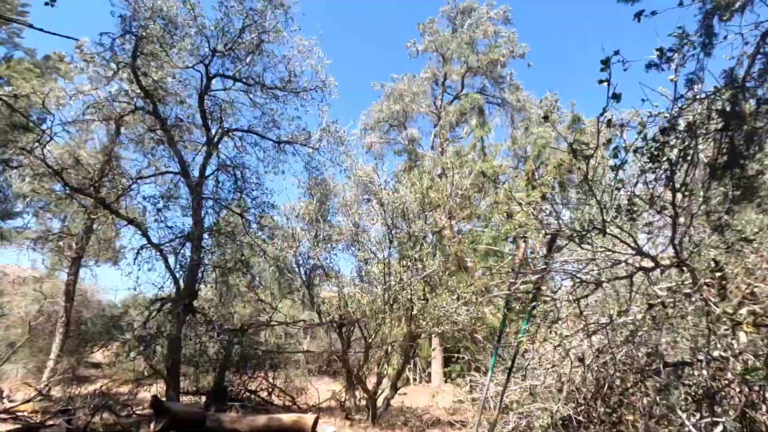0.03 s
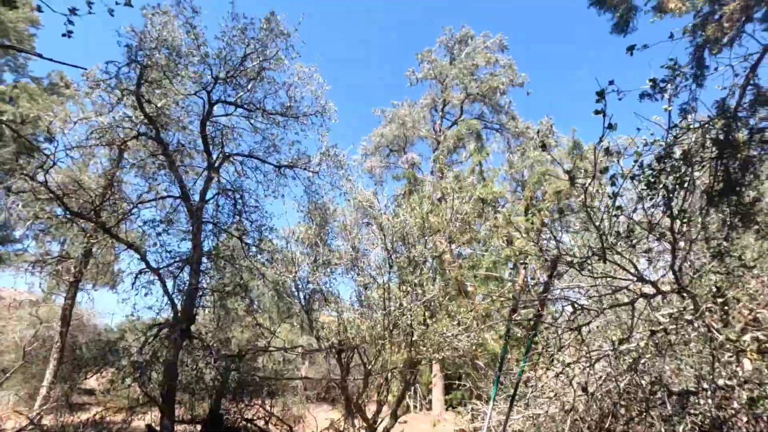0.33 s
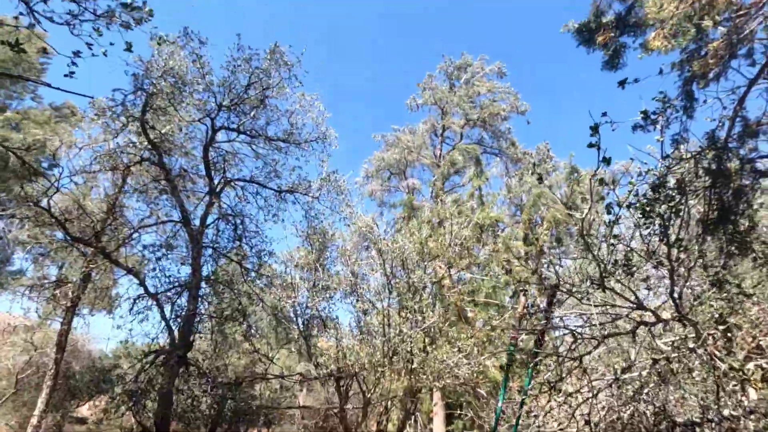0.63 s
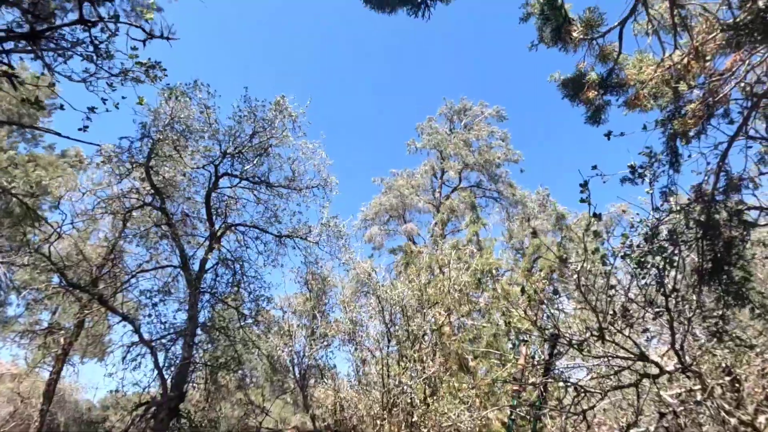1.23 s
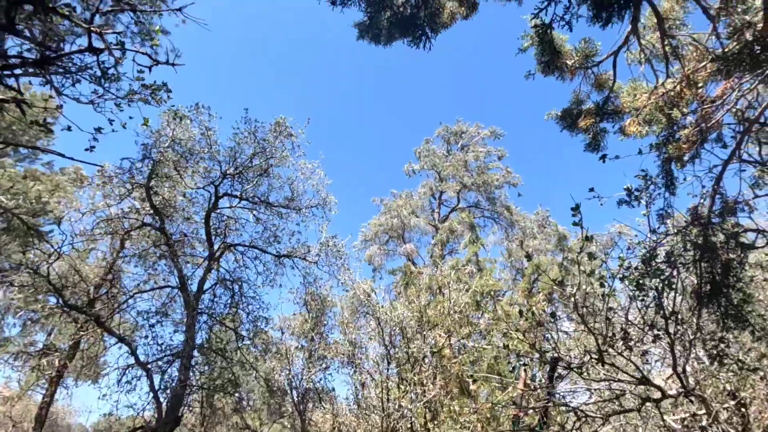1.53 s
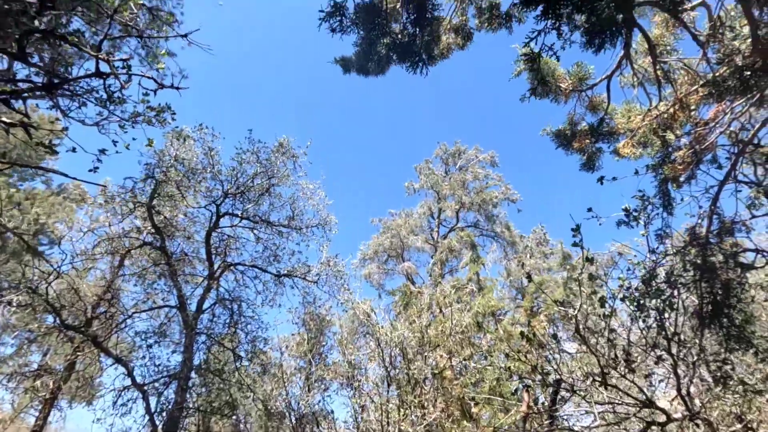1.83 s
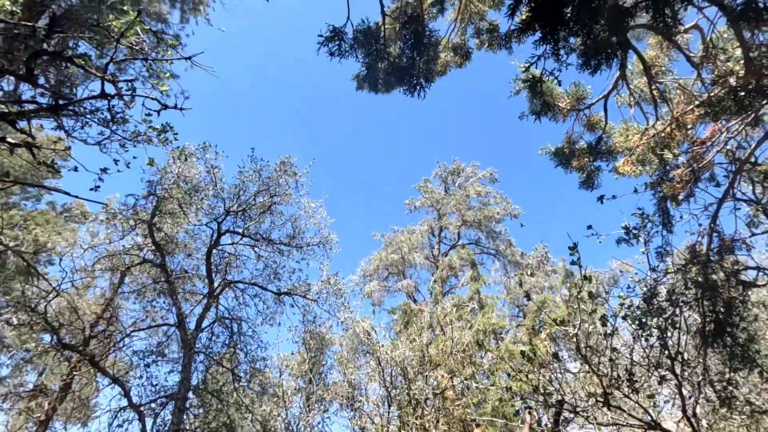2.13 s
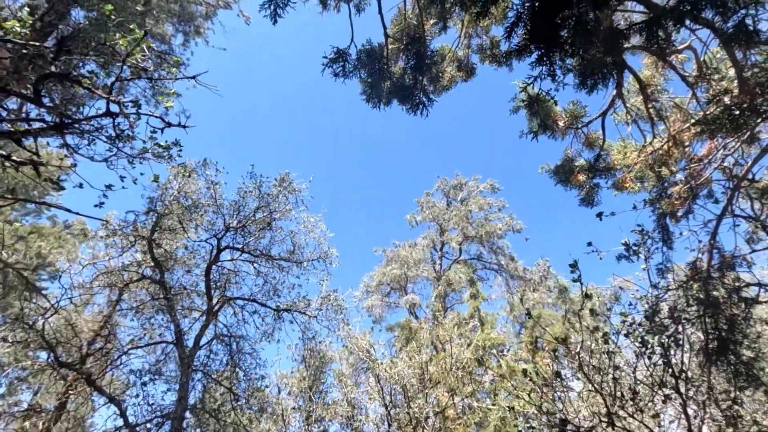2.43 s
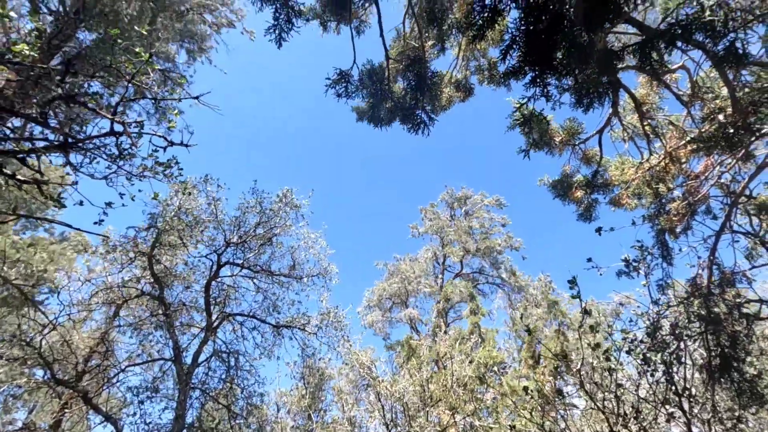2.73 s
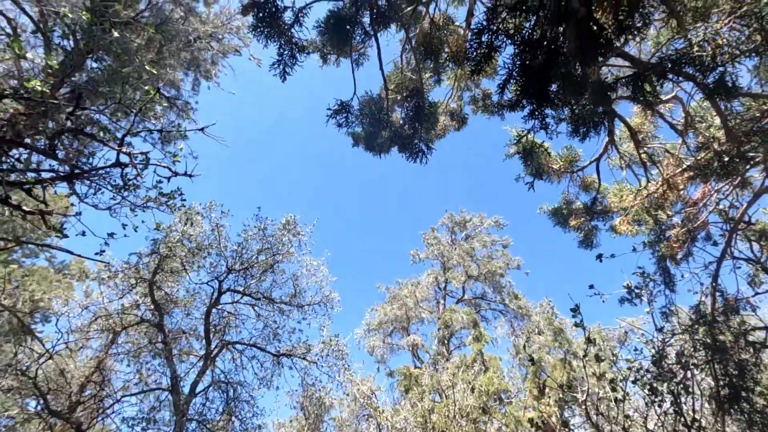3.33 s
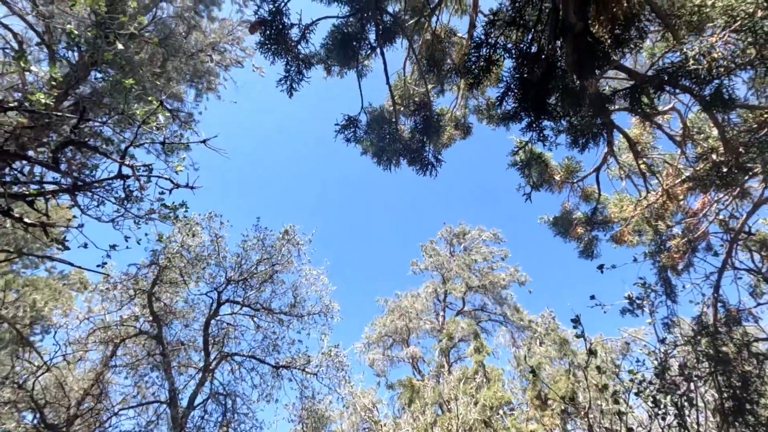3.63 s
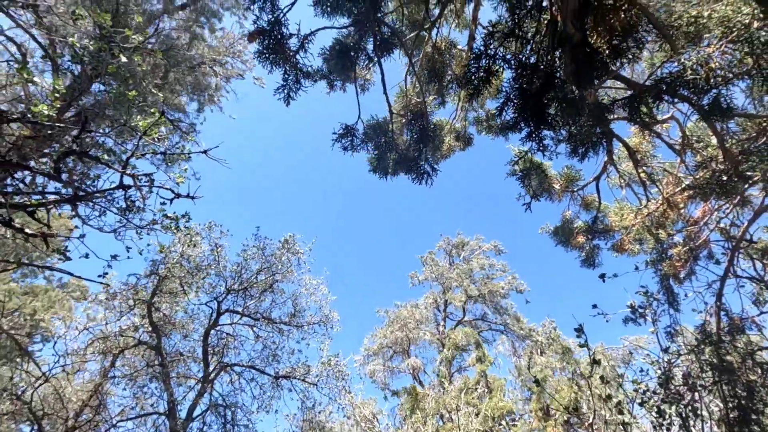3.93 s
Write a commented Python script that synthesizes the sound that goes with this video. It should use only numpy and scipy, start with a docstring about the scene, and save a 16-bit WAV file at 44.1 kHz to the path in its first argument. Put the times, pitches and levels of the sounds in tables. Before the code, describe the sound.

Uneven low wind buffeting on the microphone, with pines rushing gently behind it.

```python
"""A lumpy rumble and a few thumps of wind on the microphone, over the rush of pines easing after a gust.
One microphone stands near the ground in a clearing, where eddies press on it. In the crowns all around,
needles and twigs shed vortices, and hollow roars swell briefly as gusts cross the boughs.
The nearest needles hiss above the rush; faintly, dry leaves brush together and twigs tick."""
import sys
import numpy as np
from scipy import signal
from scipy.fft import rfft, irfft
from scipy.io import wavfile
from scipy.ndimage import uniform_filter1d

SR = 44100
rng = np.random.default_rng(int(sys.argv[2]) if len(sys.argv) > 2 else 0)


def dump_mix(stems):
    """Bounce the given channels to the path in sys.argv[1] as a 16-bit WAV at rate SR."""
    frames = np.atleast_2d(stems).T  # one column per channel
    limited = np.clip(frames, -1, 1)  # hard clip at full scale
    pcm = np.round(limited * 32767).astype(np.int16)
    wavfile.write(sys.argv[1], SR, pcm)


N = 176400
T = np.arange(N) / SR


def amp(db):
    """Decibels to gain."""
    return 10 ** (np.asarray(db) / 20)


def unit(x):
    """Scales to rms 1."""
    return x / np.sqrt(np.mean(x ** 2) + 1e-20)


def steadied(x, size):
    """Holds the rms near 1 over about size samples."""
    return x / np.sqrt(uniform_filter1d(uniform_filter1d(x ** 2, size), size) + 1e-12)


def curve(points, t):
    """Reads a control curve at times t."""
    return np.interp(t, *np.transpose(points))


def spectrum(points, hz):
    """Gain of a decibel spectrum, read on a log-frequency axis."""
    points_hz, db = np.transpose(points)
    return amp(np.interp(np.log(hz + 1), np.log(points_hz + 1), db))


def hump(hz, centre_hz, octaves):
    """Gain of a bell-shaped band."""
    return np.exp(-.5 * (np.log2((hz + 1) / centre_hz) / octaves) ** 2)


def band(x, centre_hz, octaves):
    """Filters x through a bell-shaped band."""
    hz = np.fft.rfftfreq(len(x), 1 / SR)
    return irfft(rfft(x) * hump(hz, centre_hz, octaves), len(x))


def noise(colour, patchy_db, patch_s, patch_hz, size):
    """Noise of rms 1 shaped by the gain colour(t, hz), with random louder and softer patches."""
    hop = size // 4
    t = np.arange(N // hop + 5)[:, None] * hop / SR
    hz = np.fft.rfftfreq(size, 1 / SR)
    real, imag, patches = rng.standard_normal((3, len(t), len(hz)))
    patches = uniform_filter1d(patches, max(1, round(patch_s * SR / hop)), 0)
    patches = unit(uniform_filter1d(patches, max(1, round(patch_hz * size / SR)), 1))
    gain = colour(t, hz)
    gain = gain / np.linalg.norm(gain, axis=-1, keepdims=True)
    frames = (real + 1j * imag) * gain * amp(patchy_db * patches)
    return unit(signal.istft(frames.T, nperseg=size, noverlap=size - hop)[1][:N])


# Twigs touching, barely audible at the microphone: start_s, peak_db
TWIG_TICKS = [(0.1136, -65), (1.2999, -72), (1.3783, -65), (1.705, -70), (1.9764, -66), (3.5818, -72)]


def twig_ticks(decay_s=.0014):
    """Dry twigs touch, each with one tiny, bright snap."""
    out = np.zeros(N)
    t = np.arange(512) / SR
    for start_s, peak_db in TWIG_TICKS:
        burst = rng.standard_normal(len(t)) * np.exp(-t / decay_s)
        snap = band(np.roll(burst, len(t) // 10), centre_hz=12200, octaves=.09)
        at = round(start_s * SR)
        out[at:at + len(snap)] += snap / abs(snap).max() * amp(peak_db)
    return out


# Sizzle of dry leaves around the clearing: time_s, relative_db
LEAF_SIZZLE = [(0, -88), (0.25, -87), (0.55, -78), (0.75, -81.5), (0.95, -86.5), (1.8, -84), (2.5, -87.5),
               (3.0, -82), (3.55, -88.5), (3.7, -99), (4, -95)]
# Thin swish of the leaves brushing: time_s, level_db
LEAF_SWISH = [(0, -78), (0.3, -71), (0.5, -67), (0.75, -69), (0.9, -81), (2.65, -82), (2.82, -72.5),
              (3.3, -74.5), (3.65, -84), (4, -86)]


def leaf_rustle(touches_per_s=5100, spread_db=3, flutter_db=1.5, flutter_s=.03, sizzle_gain_db=-2.5):
    """Dry leaves brush each other: a thin swish, a sizzle of tiny grains and an airy hiss at its height."""
    touches = rng.random(N) < touches_per_s / SR
    strength = amp(spread_db * np.minimum(rng.exponential(1, N), 4))
    grains = band(touches * strength, centre_hz=12400, octaves=.06)
    flutter = unit(uniform_filter1d(rng.standard_normal(N), round(flutter_s * SR)))
    sizzle_db = curve(LEAF_SIZZLE, T) + sizzle_gain_db
    sizzle = unit(grains * amp(flutter_db * flutter)) * amp(sizzle_db)
    swish = unit(band(rng.standard_normal(N), centre_hz=5560, octaves=.11))
    air = unit(band(rng.standard_normal(N), centre_hz=11500, octaves=.24))
    air_db = -84 + 2.1 * (sizzle_db - sizzle_db.max())  # falls away faster than the sizzle
    return swish * amp(curve(LEAF_SWISH, T)) + sizzle + air * amp(air_db)


# Wind in the needles closest to the microphone: time_s, relative_db
NEEDLE_WIND = [(0, -54), (0.6, -56.5), (0.9, -61), (1.2, -62), (1.5, -59.5), (2.0, -62.0), (2.4, -66.5),
               (2.65, -68.5), (2.83, -64), (3.05, -64), (3.25, -66), (3.5, -68), (4, -68.5)]
# Spectrum of their hiss: frequency_hz, density_db
NEEDLE_SPECTRUM = [(500, -7), (1500, 1), (2800, 7.5), (4200, 1.5), (5000, -2), (5800, -6.5), (7500, -8.5),
                   (9200, -18.5), (10200, -36), (12200, -29), (14000, -37), (16000, -49.5)]


def needle_hiss(gain_db=2.5):
    """Wind through the nearest needles hisses in slow waves."""
    hiss = noise(lambda t, hz: spectrum(NEEDLE_SPECTRUM, hz),
                 patchy_db=1.26, patch_s=.04, patch_hz=2500, size=512)
    return hiss * amp(curve(NEEDLE_WIND, T) + gain_db)


# Hollow swells up in the boughs: middle_s, length_s, pitch_hz, full_swell_db
BOUGH_ROARS = [(0.094, .5, 910, -38.5), (0.81, 0.7, 380, -36), (1.605, 0.19, 480, -37),
               (2.375, 0.2, 450, -39), (2.63, 0.3, 473, -42.5), (3.29, .24, 436, -39),
               (3.84, 0.27, 448, -42.5)]


def bough_roar(middle_s, length_s, pitch_hz, full_swell_db, rise_hz_per_s=137, fade_s=.11):
    """A gust crosses thicker branches: a hollow band that climbs a little and fades."""
    def colour(t, hz):
        centre_hz = pitch_hz + rise_hz_per_s * np.clip(t - middle_s, -length_s, length_s)
        return hump(hz, centre_hz, octaves=.43)
    roar = noise(colour, patchy_db=0, patch_s=.08, patch_hz=120, size=2048)
    swell = np.clip((length_s / 2 - abs(T - middle_s)) / fade_s, 0, 1)  # the shortest stop short of full
    return steadied(roar, size=4000) * swell * amp(full_swell_db)


# Wind farther off, in the crowns around the clearing: time_s, relative_db
CROWN_WIND = [(0, -30), (0.15, -31.5), (0.4, -32), (0.62, -34.5), (0.9, -33.5), (1.2, -35.5), (1.55, -35),
              (1.85, -36.5), (2.05, -35.5), (2.35, -37), (2.6, -35), (2.92, -38), (3.3, -36.6),
              (3.6, -37.2), (3.85, -36), (4, -36.4)]
# Spectrum of their rush in the usual wind: frequency_hz, density_db
CROWN_SPECTRUM = [(30, -2), (150, 1), (300, 2.5), (450, 0), (620, -1), (850, -0.5), (1100, -4.5),
                  (1500, -9), (2000, -15), (3000, -24), (4200, -36.5), (7000, -49.5), (10000, -70.5),
                  (15000, -89.5)]


def crown_rush(gain_db=.32, usual_db=-32, octaves_per_db=-.0131):
    """Countless needles and twigs shed vortices: a broad rush, slightly higher in pitch as it eases."""
    def colour(t, hz):
        shift_octaves = octaves_per_db * (curve(CROWN_WIND, t) - usual_db)
        return spectrum(CROWN_SPECTRUM, hz / 2 ** shift_octaves)
    rush = noise(colour, patchy_db=.78, patch_s=.08, patch_hz=200, size=2048)
    return steadied(rush, size=6000) * amp(curve(CROWN_WIND, T) + gain_db)


# Wind right on the microphone, near the ground: time_s, relative_db
MIC_WIND = [(0, -23), (0.12, -16.5), (0.21, -17.5), (0.33, -18), (0.45, -20), (0.54, -16.5), (0.65, -16),
            (0.715, -19), (0.76, -25), (0.95, -22.5), (1.05, -26), (1.28, -25), (1.45, -22.5),
            (1.57, -19.5), (1.7, -20), (1.77, -20.5), (1.92, -18.5), (2.04, -20.5), (2.22, -19),
            (2.31, -21.5), (2.43, -24.5), (2.48, -18), (2.62, -22.5), (2.74, -19), (2.86, -22), (2.98, -22),
            (3.1, -20.5), (3.18, -17), (3.28, -16), (3.38, -19.5), (3.53, -14.5), (3.6, -20.5), (3.85, -21),
            (3.95, -18.5), (4, -14.5)]
# Spectrum of its rumble: frequency_hz, density_db
MIC_SPECTRUM = [(8, -12.5), (20, 0), (48, 1.5), (85, -1), (125, -4.5), (170, -9), (250, -21), (400, -29),
                (800, -39), (2000, -85.5), (9000, -120)]
# Flapping at the rumble's upper edge: time_s, level_db
MIC_FLAPPING = [(0, -35.5), (0.15, -37.5), (0.4, -47.5), (0.6, -34), (0.72, -32), (0.8, -44), (3.12, -49),
                (3.24, -29.5), (3.38, -40), (3.52, -28.5), (3.63, -43), (3.8, -33.5), (4, -39.5)]


def microphone_rumble(rumble_gain_db=-2.5):
    """Eddies press on the microphone: a deep rumble, with a higher flapping in the hardest gusts."""
    eddies = noise(lambda t, hz: spectrum(MIC_SPECTRUM, hz),
                   patchy_db=1, patch_s=.06, patch_hz=194.4, size=4096)
    flaps = noise(lambda t, hz: hump(hz, centre_hz=214, octaves=.41),
                  patchy_db=-2, patch_s=.03, patch_hz=200, size=2048)
    rumble = steadied(eddies, size=3000) * amp(curve(MIC_WIND, T) + rumble_gain_db)
    flapping = steadied(flaps, size=3000) * amp(curve(MIC_FLAPPING, T))
    return rumble + flapping


# Single strong eddies hitting the microphone: middle_s, envelope_peak_db, pitch_hz
MIC_THUMPS = [(0.168, -7, 57), (0.56, -8.5, 90), (0.618, -16, 240), (0.633, -8, 118), (0.711, -6, 100.5),
              (1.575, -12.5, 52), (1.69, -12, 68), (2.226, -15, 86), (2.485, -14.5, 75), (3.178, -12, 64),
              (3.268, -12.5, 104), (3.522, -8.5, 52.4)]


def microphone_thumps(width_cycles=.41):
    """Each strong eddy passes the microphone as one quick swing of pressure."""
    out = np.zeros(N)
    for middle_s, envelope_peak_db, pitch_hz in MIC_THUMPS:
        cycles = (T - middle_s) * pitch_hz
        envelope = amp(envelope_peak_db) * np.exp(-.5 * (cycles / width_cycles) ** 2)
        out += envelope * np.sin(2 * np.pi * (cycles + rng.random()))
    return out


def scene():
    """The trees around the clearing and the wind on the microphone itself, in mono."""
    rush = crown_rush()
    roars = sum(bough_roar(*row) for row in BOUGH_ROARS)
    trees = rush + roars + needle_hiss() + leaf_rustle() + twig_ticks()
    return (trees + microphone_rumble() + microphone_thumps())[None]


def record(dry):
    """The recorder cuts the highest treble."""
    lowpass = signal.firwin(511, cutoff=15700, window=("kaiser", 9), fs=SR)
    return signal.oaconvolve(dry, lowpass[None], "same")


dry = scene()
out = record(dry)
dump_mix(out)
```